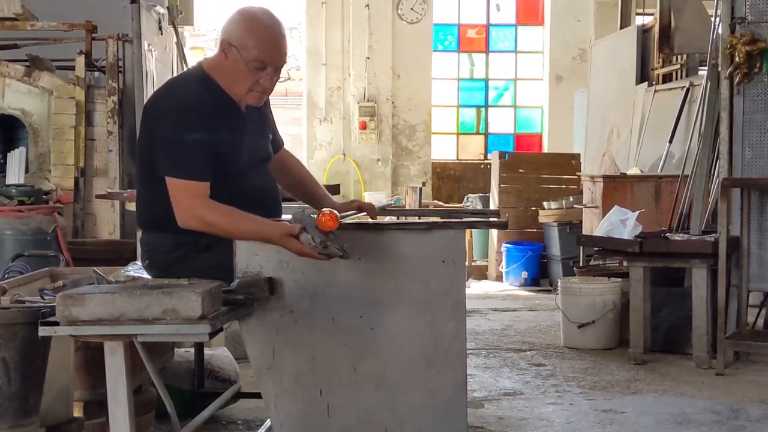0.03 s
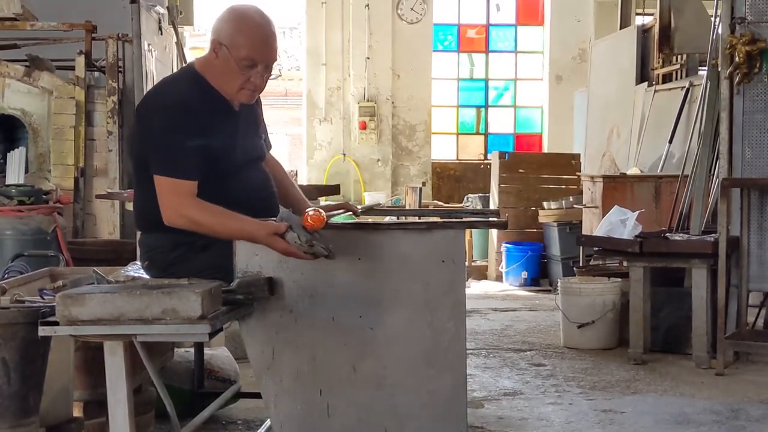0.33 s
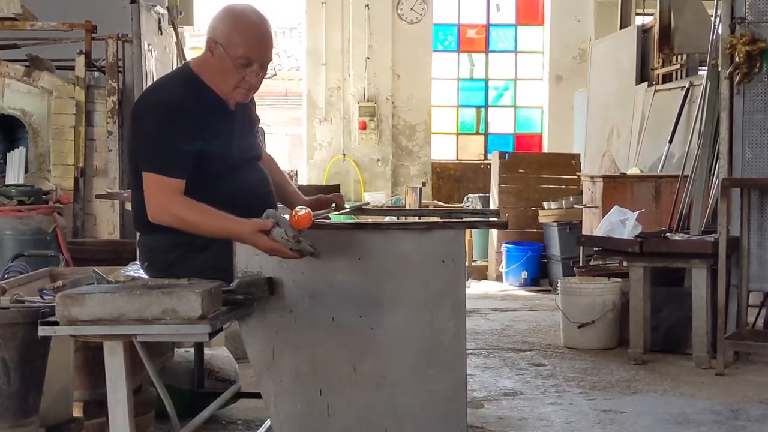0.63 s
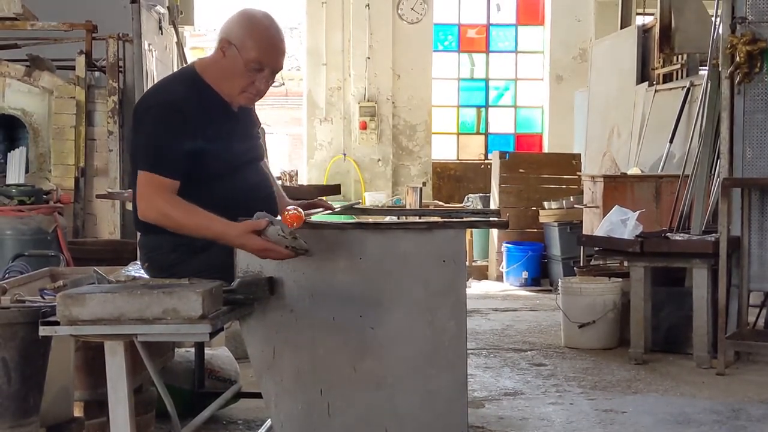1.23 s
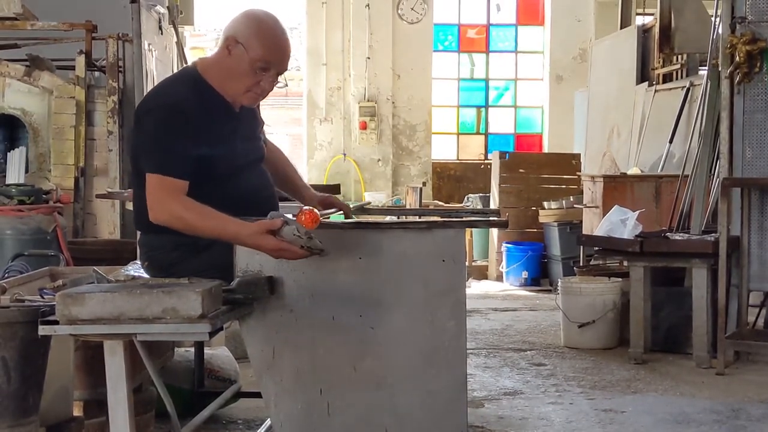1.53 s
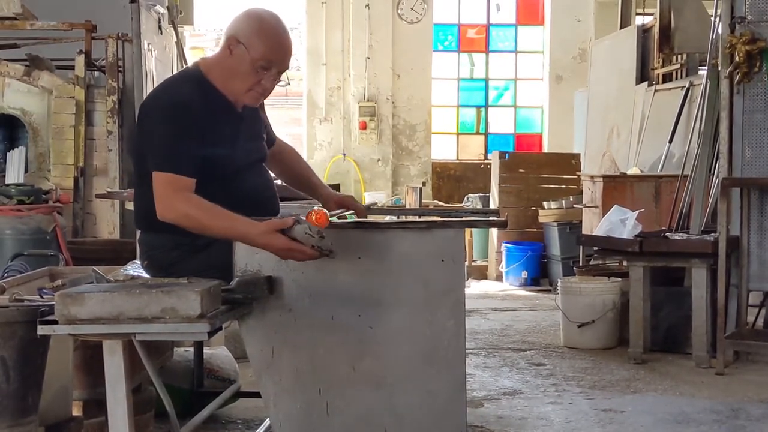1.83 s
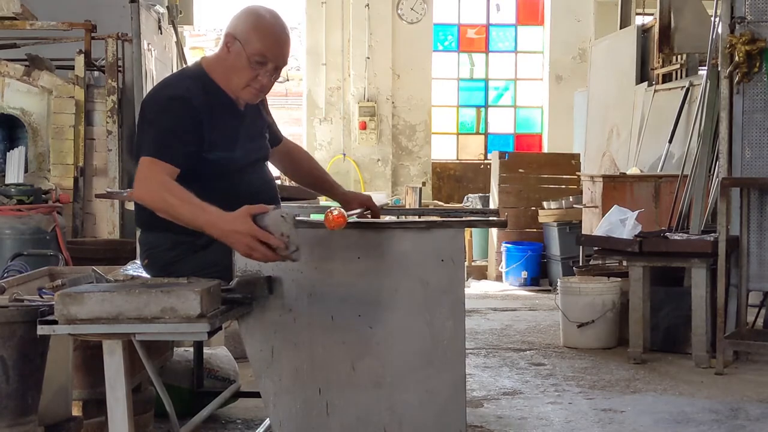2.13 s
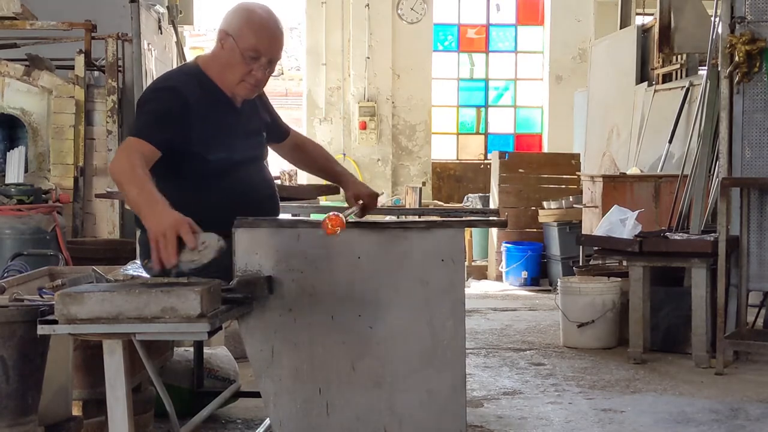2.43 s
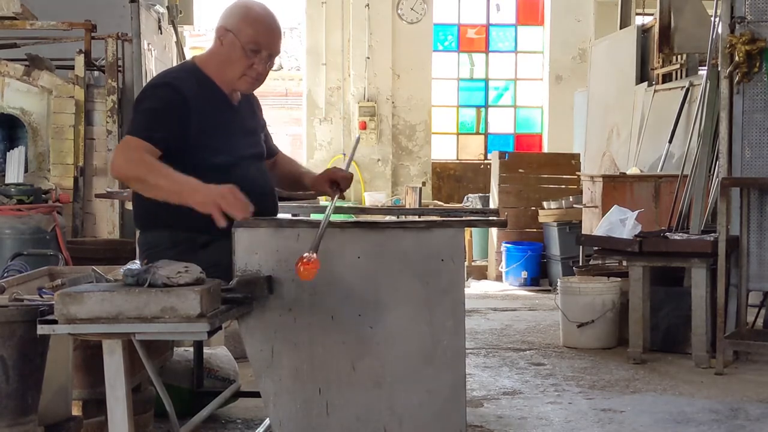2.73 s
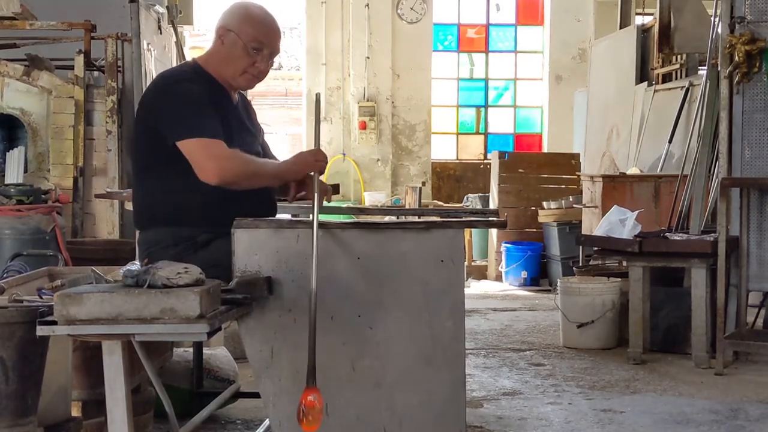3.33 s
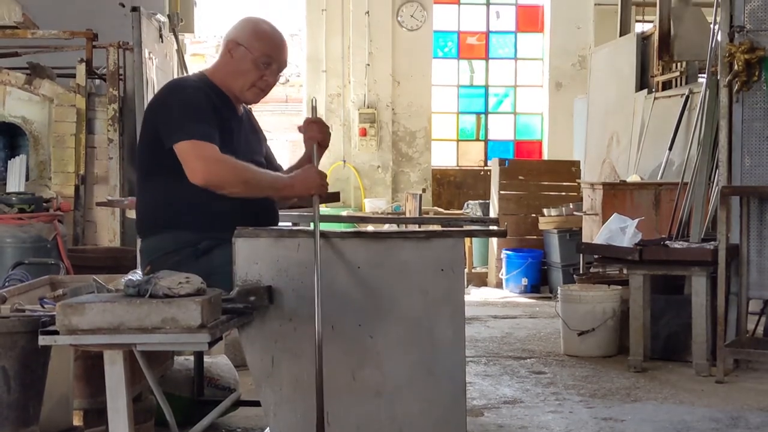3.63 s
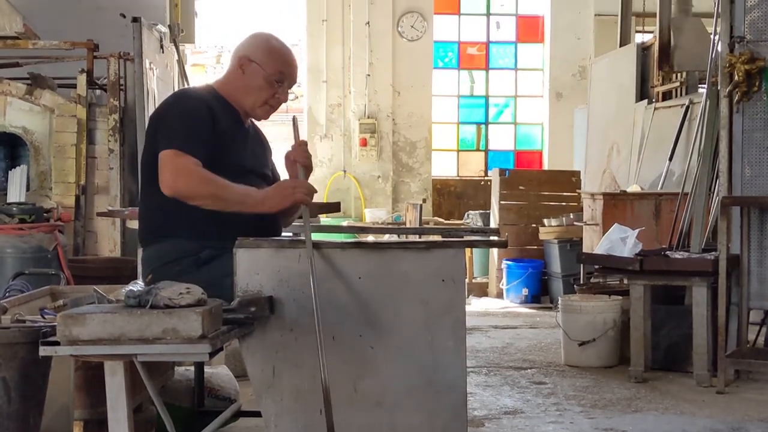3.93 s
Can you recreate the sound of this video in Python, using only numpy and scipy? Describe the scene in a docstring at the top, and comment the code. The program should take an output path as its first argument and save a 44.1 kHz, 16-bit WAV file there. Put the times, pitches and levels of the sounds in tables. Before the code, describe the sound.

A gas furnace roars steadily, with soft hisses and a late scrape of glassblowing work.

```python
"""A gas furnace roars from the first moment, heard from a stereo pair of microphones in a glass workshop:
deep combustion rumble, a wavering drone, the rush of the flame and the whistles of the burner.
In front of it a glassblower rubs a gather with a wet pad, lays the pad down and swings the pipe upright,
with puffs of steam, soft hisses and small ticks. A low tone hums briefly, far off.
At the end a rough scrape swells up in the room, with metal ringing under it."""
import sys
import numpy as np
from scipy import signal
from scipy.fft import rfft, irfft
from scipy.io import wavfile
from scipy.ndimage import uniform_filter1d

SR = 44100
rng = np.random.default_rng(int(sys.argv[2]) if len(sys.argv) > 2 else 0)


def log_audio(samples):
    """Write samples as a 16-bit WAV file to the path given in sys.argv[1]."""
    # one column per channel
    frames = np.atleast_2d(samples).T
    # limit to full scale, then quantise
    limited = np.clip(frames, -1, 1)
    pcm = np.round(limited * 32767).astype(np.int16)
    wavfile.write(sys.argv[1], SR, pcm)


N = 176400
TIME = np.arange(N) / SR
FREQS = np.maximum(np.arange(N // 2 + 1) * SR / N, 1)
LEFT_RIGHT = np.array([[1], [-1]])


def from_db(db):
    """Decibels to gain."""
    return 10 ** (np.asarray(db) / 20)


def spectrum(points):
    """Gain at every frequency from (Hz, dB) points."""
    hz, db = np.transpose(points)
    return from_db(np.interp(np.log(FREQS), np.log(hz), db))


def resonance(hz, width):
    """Gain of a steep-sided resonance that passes unit power."""
    shape = 1 / (1 + ((FREQS - hz) / (.75 * width)) ** 2)
    return shape / np.sqrt(np.sum(shape ** 2) * SR / N)


def resonances(rows):
    """Gain of several resonances whose powers add."""
    return np.sqrt(sum((from_db(db) * resonance(hz, width)) ** 2 for hz, width, db in rows))


# Width of the room at the microphones. Each row: frequency in Hz, side minus mid in dB.
ROOM_WIDTH = [(60, -29), (125, -26.5), (250, -15.5), (480, -10.5), (680, -8.5), (1000, -3.5), (1900, 3.5),
              (2400, -0.5), (3800, -1.5), (7000, 0), (15000, 0.5)]
def room_noise(density):
    """Stereo noise of a given amplitude per root Hz: alike in the bass, diffuse in the treble."""
    mid, side = rfft(rng.standard_normal((2, N)))
    width = spectrum(ROOM_WIDTH)
    pair = (mid + width * side * LEFT_RIGHT) / np.sqrt(1 + width ** 2)
    return irfft(pair * density * np.sqrt(SR / 2), N)


def ride_level(noise, curve, steadiness, window_s):
    """Calm the chance swells of a noise and let it ride a level curve around its mean."""
    power = np.mean(noise ** 2, axis=0)
    size = int(window_s * SR)
    local_power = uniform_filter1d(uniform_filter1d(power, size), size // 2)
    calmed = noise * (power.mean() / local_power) ** (steadiness / 2)
    gain = from_db(np.interp(TIME, *np.transpose(curve)))
    return calmed * gain / np.sqrt(np.mean(gain ** 2))


def swell(peak_s, rise_s, fall_s):
    """A rounded rise to a peak, then an exponential fall."""
    age = TIME - peak_s
    return np.exp(-(np.minimum(age, 0) / rise_s) ** 2 - np.maximum(age, 0) / fall_s)


def force(strokes):
    """Strength of the rubbing over time, one swell for each stroke."""
    return np.sqrt(sum((from_db(db) * swell(s, rise, fall)) ** 2 for s, rise, fall, db in strokes))


def grainy_noise(strokes, colour, grain_hz, grain_db):
    """Noise that swells with each stroke, with the quick unevenness of a rubbing contact."""
    noise = room_noise(spectrum(colour))
    knots = rng.standard_normal(4000)
    grain = from_db(grain_db * np.interp(TIME * grain_hz, np.arange(len(knots)), knots))
    return noise * force(strokes) * grain


# The low end of the furnace. Each row: frequency in Hz, density in dB per Hz.
RUMBLE_SPECTRUM = [(20, -72), (38, -64), (54, -59.5), (63, -45), (73, -35.5), (84, -35.5), (96, -42),
                   (103, -36), (109, -41), (119, -35), (138, -46.5), (160, -50.5), (185, -66), (300, -99)]
# Its throb. Each row: time in seconds, relative level in dB.
RUMBLE_THROB = [(0.0, -18.5), (0.59, -24.5), (0.63, -18), (1.31, -22.5), (1.46, -32), (1.5, -20.5),
                (1.89, -26), (1.97, -19.5), (2.02, -24.5), (2.05, -20), (2.6, -20), (2.65, -16),
                (2.68, -22), (3.13, -20.5), (3.53, -22.5), (3.55, -20.5), (3.91, -23), (4.0, -17)]
def combustion_rumble():
    """Burning gas throbs in the bass, which reaches the right microphone first."""
    left_lag_s = 0.00014
    noise = room_noise(spectrum(RUMBLE_SPECTRUM))
    left, right = ride_level(noise, RUMBLE_THROB, steadiness=0.8, window_s=0.12)
    return np.array([np.interp(TIME - left_lag_s, TIME, left), right])


# The wavering of the drone. Each row: time in seconds, relative level in dB.
DRONE_WAVER = [(0.0, -42), (0.12, -28), (0.15, -42.5), (0.4, -45), (0.71, -30), (0.86, -36), (1.1, -32.5),
               (1.15, -46), (1.18, -34), (1.38, -43.5), (1.53, -34.5), (1.59, -47), (1.65, -34.5),
               (2.12, -41), (2.13, -35), (2.88, -39.5), (3.79, -37), (4.0, -33)]
def furnace_drone():
    """One narrow band of the roar stands out as a wavering note."""
    noise = room_noise(from_db(-35) * resonance(hz=658.8, width=15.5))
    return ride_level(noise, DRONE_WAVER, steadiness=0.54, window_s=0.094)


# Modes of the burner and its duct. Each row: centre in Hz, width in Hz, rms level in dB.
DUCT_MODES = [(325.2, 9.4, -45.5), (388.2, 18, -49.5), (509, 3.5, -53.5), (574, 16, -52.5),
              (617, 11, -42.5), (719, 45, -45), (846, 61, -54), (1064, 23, -48.5), (1463, 69, -57),
              (1677, 69, -54.5), (2260, 138, -43), (2360, 80, -48.5), (2690, 120, -56), (2885, 77, -48.5),
              (3884, 146, -48.5), (4022, 124, -50), (5070, 100, -60.5)]
# Sizzle of the gas nozzle. Each row: centre in Hz, width in Hz, rms level in dB.
NOZZLE_BANDS = [(7090, 150, -60.5), (8150, 56, -66), (9060, 200, -70.5), (9900, 150, -70),
                (11800, 200, -82), (12800, 35, -81), (13600, 40, -73)]
def burner():
    """Burner and duct resonate steadily, with the faint sizzle of the nozzle on top."""
    return room_noise(resonances(DUCT_MODES + NOZZLE_BANDS))


# The flame as it fills the workshop. Each row: frequency in Hz, density in dB per Hz.
RUSH_SPECTRUM = [(60, -84), (185, -56), (240, -58.5), (290, -61), (390, -67.5), (480, -67.5), (570, -61.5),
                 (710, -64.5), (770, -72.5), (940, -74.5), (1100, -74), (1420, -71), (1560, -77),
                 (1950, -84), (2600, -81.5), (3100, -78.5), (3400, -83), (3750, -81), (4350, -86),
                 (5200, -87.5), (5800, -90), (8900, -90.5), (9900, -96.5), (10400, -102), (12000, -96.5),
                 (15000, -107)]
def flame_rush():
    """The flame gives off a broad, even rush."""
    return room_noise(spectrum(RUSH_SPECTRUM))


# Thin whistles of the gas jet. Each row: pitch in Hz, rms level in dB.
JET_WHISTLES = [(1041, -54.5), (1231, -56.5), (1384, -68), (1688, -67), (1876, -59.5), (2202, -48),
                (2235, -47.5), (2266, -53), (2292, -50.5), (2371, -48), (2405, -46.5), (2720, -59),
                (2972, -70)]
def jet_whistles():
    """Each whistle wavers and stands in the room with a phase of its own between the microphones."""
    width = spectrum(ROOM_WIDTH)
    pair = 0
    for k, (hz, db) in enumerate(JET_WHISTLES):
        tone = rfft(rng.standard_normal(N)) * from_db(db) * resonance(hz, width=4)
        phase = (-1) ** k * np.arctan(width[int(hz * N / SR)])
        pair = pair + tone * np.exp(1j * phase * LEFT_RIGHT)
    return irfft(pair * np.sqrt(SR / 2), N)


# Puffs off the pad. Each row: peak time, rise and fall in seconds, gain in dB.
STEAM_PUFFS = [(1.44, .022, 0.027, 0), (1.75, .07, .02, -7), (2.83, 0.074, .12, -7)]
# The steam at unit gain. Each row: frequency in Hz, density in dB per Hz.
STEAM_SPECTRUM = [(4000, -108), (9000, -86), (11500, -90), (13200, -84), (14200, -87), (15000, -91)]
def steam_puffs():
    """Steam leaves the wet pad in thin, high puffs."""
    return grainy_noise(STEAM_PUFFS, STEAM_SPECTRUM, grain_hz=300, grain_db=1.5)


def distant_hum(hz=231, peak_s=1.93, spread_s=0.146, rms_db=-37.5):
    """Far from the microphones, a faint low tone swells and fades."""
    envelope = np.exp(-((TIME - peak_s) / spread_s) ** 2)
    return np.sqrt(2) * from_db(rms_db) * envelope * np.sin(2 * np.pi * hz * TIME)


# Strokes of pad and pipe. Each row: peak time, rise and fall in seconds, gain in dB.
HISS_STROKES = [(2.45, 0.034, .05, -7), (2.535, .045, 0.11, 1), (2.685, 0.038, .24, 0.5),
                (2.91, .04, 0.076, -7), (3.35, 0.14, 0.12, -3.5)]
# Their hiss at unit gain. Each row: frequency in Hz, density in dB per Hz.
HISS_SPECTRUM = [(600, -75.5), (1500, -78), (3000, -78.5), (5300, -80.5), (6200, -84), (8500, -85),
                 (10000, -86.5), (12500, -88.5), (15000, -91)]
def pad_and_pipe_hiss():
    """In front of the furnace, the wet pad rubs and the pipe slides with soft hisses."""
    return grainy_noise(HISS_STROKES, HISS_SPECTRUM, grain_hz=210, grain_db=2.0)


# Dull scuffs and scrapes in the room. Each row: peak time, rise and fall in seconds, gain in dB.
SCRAPE_STROKES = [(2.51, 0.073, 0.07, -15.5), (2.645, .025, .06, -8.5), (3.39, .1, 0.31, -9),
                  (3.79, 0.026, 0.17, -12.5), (3.985, 0.036, 0.075, -0.5)]
# Their grit at unit gain. Each row: frequency in Hz, density in dB per Hz.
SCRAPE_SPECTRUM = [(150, -74), (330, -54.5), (520, -70), (830, -57.5), (1100, -60.5), (1480, -64),
                   (1900, -63.5), (2500, -70), (3500, -69.5), (5000, -76.5), (6200, -84), (9500, -84.5),
                   (15000, -105)]
# Modes of the scraped metal. Each row: centre in Hz, width in Hz, relative level in dB.
METAL_MODES = [(393, 26, -35), (846, 25, -33), (1364, 22, -38), (1426, 19, -33.5), (1530, 25, -39.5),
               (2020, 320, -46), (2340, 160, -37), (5200, 260, -49)]
def scraped_metal():
    """A gritty scrape sets the metal ringing under it."""
    drive = force(SCRAPE_STROKES) ** 1.26  # harder scrapes ring out of proportion
    ring = from_db(2.5) * room_noise(resonances(METAL_MODES)) * drive
    grit = grainy_noise(SCRAPE_STROKES, SCRAPE_SPECTRUM, grain_hz=120, grain_db=1.0)
    return grit + ring


# Small ticks and knocks of the tools. Each row: peak time in seconds, centre and width in Hz,
# decay in seconds, rms level at the peak in dB.
TOOL_TICKS = [(2.627, 13900, 1500, .005, -40), (2.629, 8000, 5000, .004, -41),
              (2.638, 890, 200, .04, -36.5), (2.784, 4500, 3000, .005, -47),
              (2.808, 12500, 3000, .005, -52), (2.98, 7160, 150, 0.043, -50)]
def tool_ticks(rise_s=.002):
    """Light contacts, each a short ring in one band."""
    return sum(room_noise(from_db(db) * resonance(hz, width)) * swell(peak_s, rise_s, decay_s)
               for peak_s, hz, width, decay_s, db in TOOL_TICKS)


def scene():
    """The workshop from the microphones: the furnace, a far hum and the handwork in front."""
    furnace = combustion_rumble() + furnace_drone() + burner() + flame_rush() + jet_whistles()
    handwork = pad_and_pipe_hiss() + steam_puffs() + scraped_metal() + tool_ticks()
    return furnace + distant_hum() + handwork


def record(dry):
    """Both microphone channels are softened at the ends and cut steeply at the top."""
    fade_s, cutoff_hz = .002, 15300
    fade = np.clip(np.minimum(TIME, TIME[-1] - TIME) / fade_s, 0, 1)
    lowpass = signal.ellip(12, .1, 80, cutoff_hz, fs=SR, output="sos")
    return signal.sosfilt(lowpass, dry * fade)


dry = scene()
out = record(dry)
log_audio(out)
```